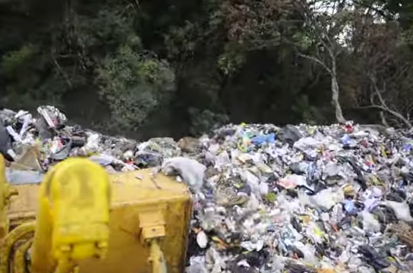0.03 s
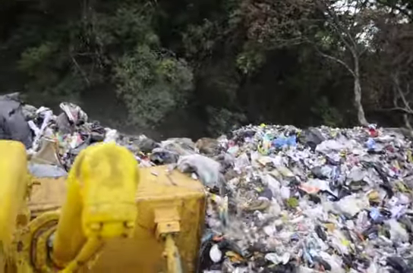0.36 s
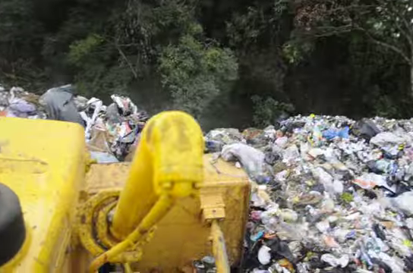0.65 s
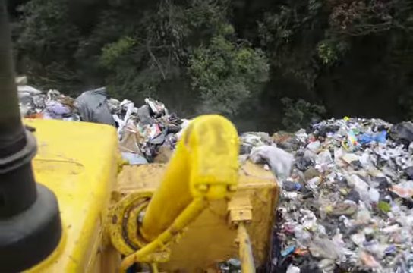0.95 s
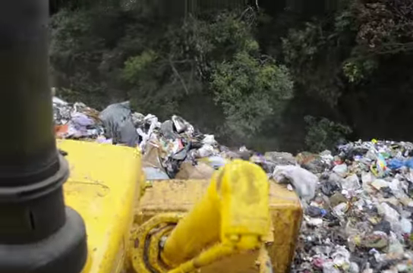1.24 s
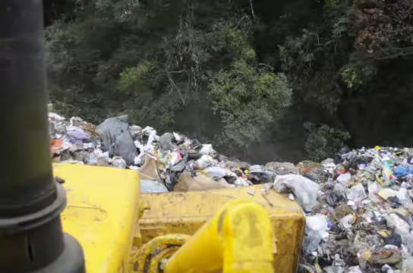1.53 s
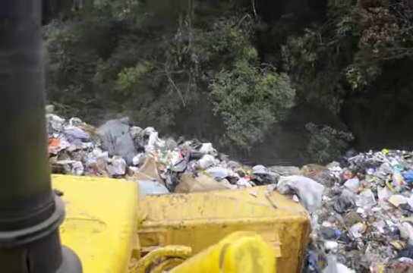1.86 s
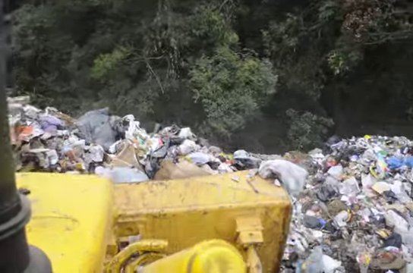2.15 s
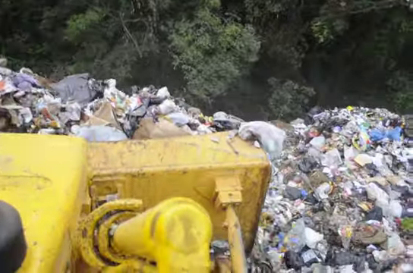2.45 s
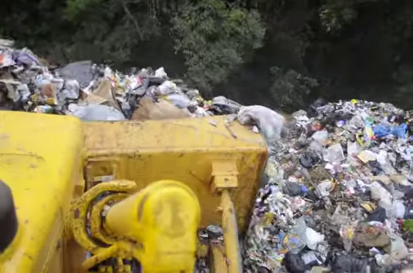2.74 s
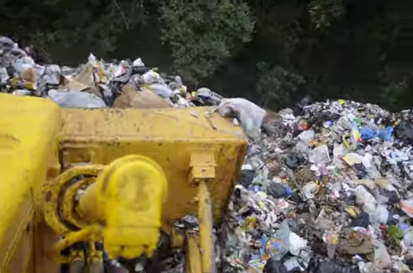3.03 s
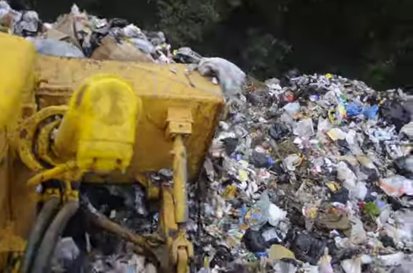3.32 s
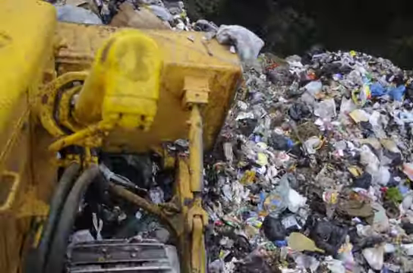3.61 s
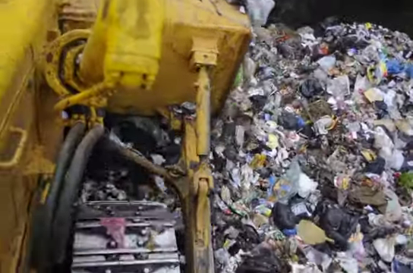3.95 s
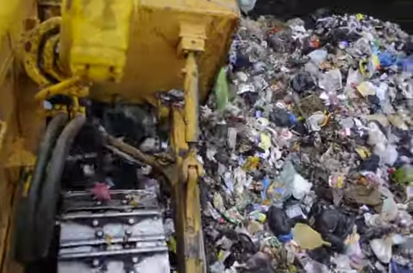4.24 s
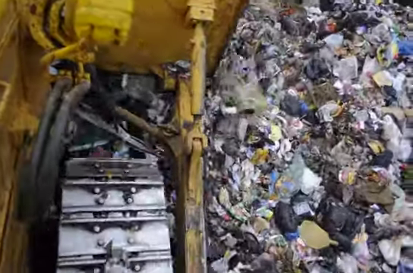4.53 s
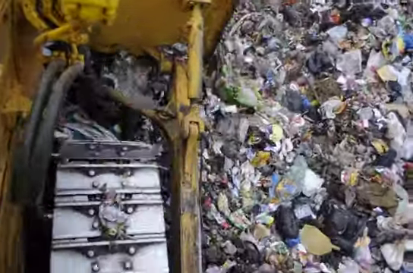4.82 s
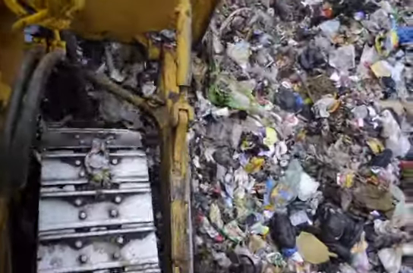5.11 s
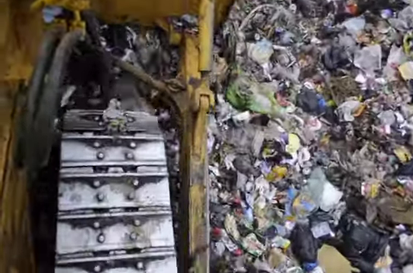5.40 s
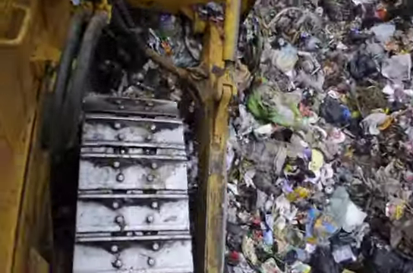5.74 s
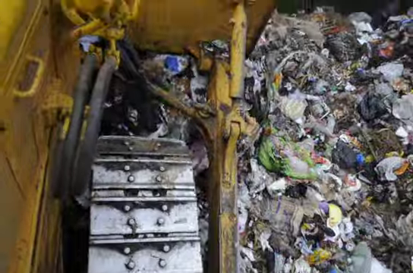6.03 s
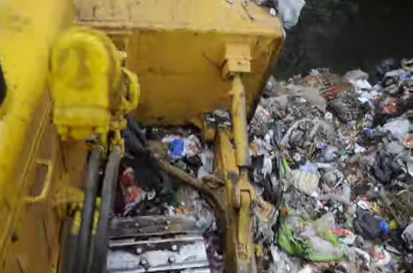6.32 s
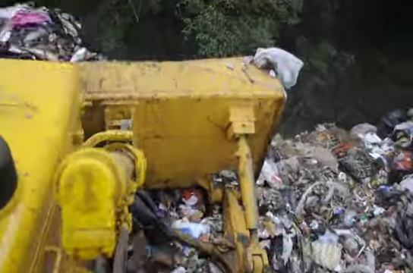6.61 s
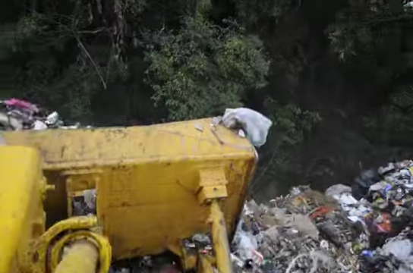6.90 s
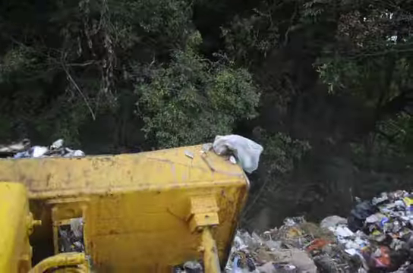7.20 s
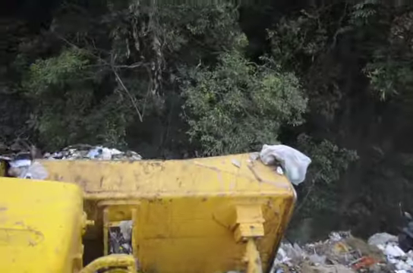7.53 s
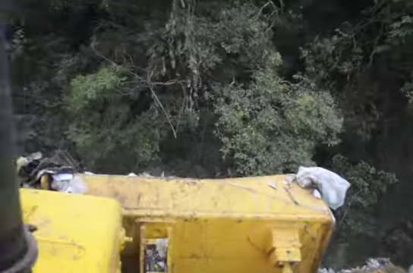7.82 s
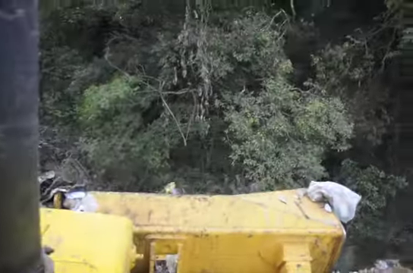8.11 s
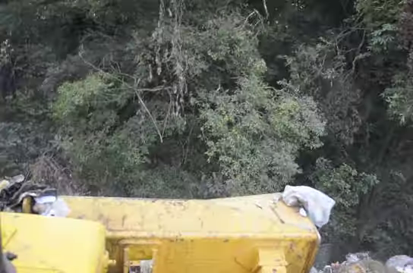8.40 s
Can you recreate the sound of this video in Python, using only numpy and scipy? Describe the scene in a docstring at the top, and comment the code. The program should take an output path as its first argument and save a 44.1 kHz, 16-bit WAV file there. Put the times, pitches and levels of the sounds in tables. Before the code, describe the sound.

Close diesel engine of a bulldozer running at working speed, briefly dropping to a rattling idle before picking up with hard knocks.

```python
"""A bulldozer's four-cylinder diesel, heard from on board in the open. At working speed each firing thumps
out of the exhaust stack and knocks in the block, over valve and gear clatter and rumbling bonnet panels.
From 2.5 s the microphone dips towards the track and comes back. At 6.7 s the fuel is cut: the engine
runs down to a shaking idle, with intake drone, stray knocks and small rattles. At 7.8 s the throttle
opens and the engine picks up with hard knocks."""
import sys
import numpy as np
from scipy import signal
from scipy.fft import rfft, irfft
from scipy.io import wavfile

SR = 44100
rng = np.random.default_rng(int(sys.argv[2]) if len(sys.argv) > 2 else 0)


def store_wav(level_fs):
    """Save 16-bit WAV to argv[1]."""
    pcm = np.round(np.clip(np.atleast_2d(level_fs), -1, 1) * 32767)
    wavfile.write(sys.argv[1], SR, pcm.T.astype(np.int16))


N = 373086
TIME = np.arange(N) / SR
AGE = TIME[:SR // 10]  # time since an impulse [s]


# exhaust pulse spectrum (frequency [Hz], level [dB])
STACK_SPECTRUM = [(20, -55), (40, -10.5), (52, -10), (100, -5), (150, -0.5), (205, 1.5), (255, 0.5),
                  (305, -4.5), (390, -27), (550, -12.5), (900, -13.5), (1600, -52), (4000, -46.5)]
# stack peaks and notches at the track (centre [Hz], width [Hz], gain [dB])
STACK_TRACK_MODES = [(142, 29, -0.5), (195, 8.6, -8), (246, 11, 7), (320, 200, 2), (570, 540, -6),
                     (857, 53, 8.5)]

def exhaust(phase, jitter_s=.00008, return_s=.0039, ring_hz=268, ring_swell_s=.0039, ring_lag_s=.0014):
    """Each firing thumps out of the stack, harder with fuel and speed; mainly one rings the pipe."""
    times, (_, pipe_db) = firings(phase, angle=.35)
    scatter, jitter = rng.standard_normal((len(times), 2)).T
    coast, _, surge = throttle(times)
    slow = slowness(times)
    gas = .55 + .45 * fuelling(times)  # air + fuel
    chug_db = 3.5 * coast * slow ** 8  # governor catches the idle
    effort_db = -6 * slow + chug_db + 6 * surge
    size = gas * undb(effort_db + .8 * mic_dip(times) + .9 * scatter)
    times = times + jitter_s * jitter
    # at low speed each pulse returns once along the pipe
    labour = np.clip(3 * slow, 0, 1) ** 2
    puffs = pulses(times, size) + .78 * pulses(times + return_s, size * labour)
    thump = -aimed_colour(puffs, STACK_SPECTRUM, (), STACK_TRACK_MODES)
    ring = AGE * np.exp(-AGE / ring_swell_s) * np.sin(2 * np.pi * ring_hz * AGE)
    pipe = strike(times + ring_lag_s, size * (1 - labour / 2) * undb(pipe_db), ring)
    return undb(-23.1) * thump + undb(-31.5) * unit(pipe)


# cylinders in firing order (knock [dB], pipe ring [dB])
CYLINDER_LEVELS = [(-3, -20), (2.3, -24), (-3, 0), (1.8, -18)]

def firings(phase, angle):
    """Time of each firing at this fraction of its interval, and its cylinder's levels."""
    index = np.arange(int(phase[-1]) + 1)
    times = np.interp(index + angle, phase, TIME, right=2 * TIME[-1])
    return times, np.array(CYLINDER_LEVELS)[index % len(CYLINDER_LEVELS)].T


def knock(phase, jitter_s=.00013, rise_s=.0014, decay_s=.0064, crack_hz=3000):
    """Abrupt ignition: pressure ripple swells and dies in the block; the harder, the brighter."""
    times, (cylinder_db, _) = firings(phase, angle=.432)
    scatter, jitter = rng.standard_normal((len(times), 2)).T
    times = times + jitter_s * jitter
    fuel, dip = np.maximum(fuelling(times), 0), mic_dip(times)
    force = fuel * undb(-3.5 * dip)
    hardness = force ** 2.8 * undb(-6 * dip)
    size = force * undb((cylinder_db + .98 * scatter) / np.maximum(fuel, 1))  # more even at full fuel
    burst = (1 - np.exp(-AGE / rise_s)) ** 2 * np.exp(-AGE / decay_s)
    ripple = strike(times, size, burst) * rng.standard_normal(N)
    crack = strike(times, hardness, burst) * rng.standard_normal(N)
    return undb(-23.5) * unit(highpass(ripple, 650, order=1)) + undb(-27) * unit(highpass(crack, crack_hz))


def clatter(phase, taps_per_firing=5, decay_s=.003):
    """Valves, gears and linkage tap over the fan's rush; gears ease off load, then rattle near idle."""
    taps = np.arange(int(phase[-1] * taps_per_firing))
    tap_phase = (taps + .3 * rng.standard_normal(len(taps))) / taps_per_firing
    times = np.interp(tap_phase, phase, TIME)
    tapping = strike(times, np.ones(len(taps)), np.exp(-AGE / decay_s)) * rng.standard_normal(N)
    fan = rng.standard_normal(N)
    slack = 1 - .3 * np.cos(np.pi * (phase - .33)) ** 4  # compression holds the gears tight
    rattle = slack * (unit(tapping) + fan)
    rattle = rattle - .23 * highpass(rattle, 650, order=1)  # duller than the knock
    coast, pull, _ = throttle()
    backlash_db = 7 * slowness() ** 4
    return undb(-27.5 + 3.5 * mic_dip() + coast * (backlash_db - 1.5) + 2.3 * pull) * unit(rattle)


# stray knocks and small rattles (time [s], level [dB])
STRAY_HITS = [(6.897, -23.5), (7.345, -18), (7.413, -22), (7.745, -14.5)]

def stray_knocks(decay_s=.008):
    """Knocks and small rattles as the engine slows; the last is a firing knock just before the pickup."""
    times, db = np.transpose(STRAY_HITS)
    return strike(times, undb(db), np.exp(-AGE / decay_s)) * rng.standard_normal(N)


# radiation of the engine's iron (frequency [Hz], level [dB])
IRON_SPECTRUM = [(150, -37), (400, -7.5), (550, 1), (750, 0.5), (1000, -3.5), (1500, -5.5), (2200, -3.5),
                 (2550, -8), (3500, -11.5), (4200, -19), (5000, -28), (6500, -34.5)]
# its peaks and notches over the bonnet (centre [Hz], width [Hz], gain [dB])
IRON_BONNET_MODES = [(552.5, 49, 4.5), (721, 49, 2), (953, 87, -9), (1235, 260, 7.5), (1628, 51, 9.5),
                     (1717, 170, -10.5), (1953, 110, 8), (2240, 170, 5), (3800, 200, 0.5)]
# its peaks and notches at the track (centre [Hz], width [Hz], gain [dB])
IRON_TRACK_MODES = [(557, 430, -7.5), (864, 180, 10.5), (949, 13, 6.5), (1120, 91, -10), (1317, 320, 7),
                    (1768, 220, 8), (2140, 210, 5.5), (2364, 300, -9), (3470, 1300, -1)]

def ironwork(blows, tail_db=-10, decay_s=.014):
    """The block radiates the blows; covers and frame add a short tail of close modes."""
    age = TIME[:SR // 8]
    tail = highpass(rng.standard_normal(len(age)), 670) * np.exp(-age / decay_s)
    ringing = blows + undb(tail_db) * signal.fftconvolve(blows, tail / np.linalg.norm(tail))[:N]
    return np.std(blows) * aimed_colour(ringing, IRON_SPECTRUM, IRON_BONNET_MODES, IRON_TRACK_MODES)


# bonnet panel response (frequency [Hz], level [dB])
PANEL_SPECTRUM = [(25, -51.5), (60, -24), (110, -8.5), (170, -1), (225, -0.5), (290, -5), (350, -8.5),
                  (400, -18.5), (900, -44)]

def bonnet(phase):
    """Loose panels rumble, jolted at each firing; harder near idle as the engine rocks on its mounts."""
    jolt = 1 + .65 * np.cos(2 * np.pi * (phase - .72))
    rumble = unit(colour(jolt * rng.standard_normal(N), PANEL_SPECTRUM))
    return undb(-28 + 3 * mic_dip() + 6.5 * slowness() ** 5) * rumble


def intake(phase, duct_hz=68, duct_q=1.3):
    """Air drawn by the pistons drones in a resonant duct on three harmonics, once the speed sags."""
    harmonic = np.arange(1, 4)[:, None]
    tuning = harmonic * firing_hz() / duct_hz
    partials = np.cos(2 * np.pi * harmonic * (phase - .535)) / np.hypot(1, duct_q * (tuning - 1 / tuning))
    onset = ramp(slowness() / .29) ** 2
    _, pull, _ = throttle()
    return onset * undb(-31 - 1.5 * pull) * unit(partials.sum(axis=0))


CUT_S, IDLE_HZ = 6.672, 25.86
PICKUP_S, PICKUP_HZ = 7.762, 45.97
# governed speed, varying with load (time [s], firing rate [Hz])
GOVERNED_RATE = [(0, 49.92), (.44, 51.25), (1.0, 51.2), (1.255, 50.19), (2.25, 50.3), (3.07, 51.75),
                 (3.77, 51.3), (4.0, 50.38), (4.97, 51.24), (6.7, 50.81)]

def firing_hz(at=TIME, run_down_s=.461, run_up_s=.618):
    """Governed speed; the flywheel runs down after the cut and climbs after the pickup."""
    spin = np.exp(-(np.maximum(at - CUT_S, 0) / run_down_s) ** 1.5)
    coasting_hz = IDLE_HZ + (curve(GOVERNED_RATE, at) - IDLE_HZ) * spin
    return PICKUP_HZ + (coasting_hz - PICKUP_HZ) * np.exp(-np.maximum(at - PICKUP_S, 0) / run_up_s)


def slowness(at=TIME):
    """0 at working speed, 1 at idle."""
    return np.clip(1 - (firing_hz(at) - IDLE_HZ) / (curve(GOVERNED_RATE, at) - IDLE_HZ), 0, 1)


def throttle(at=TIME, close_s=.085, open_s=.01, surge_s=.14):
    """Fuel rack state: coasting, pulling, first surge of the pull (each 0-1)."""
    pull = ramp((at - PICKUP_S) / open_s + .5)
    coast = ramp((at - CUT_S) / close_s) - pull
    surge = pull * np.exp(-((at - PICKUP_S) / surge_s) ** 4)
    return coast, pull, surge


def fuelling(at):
    """Fuel per firing, 1 at work: cut, fed back near idle, rich at the pickup, easing with speed."""
    coast, pull, surge = throttle(at)
    slow = slowness(at)
    working = 1 - coast - pull
    return working + .56 * coast * slow ** 1.7 + 2.32 * pull * slow ** .16 + .5 * surge


# microphone aim (time [s], dip [0-1])
MIC_AIM = [(0, 0.22), (2.45, 0.08), (3.15, 0.48), (4.5, 0.71), (6.05, 0.76), (6.7, 0.33), (7.3, 0.34)]

def mic_dip(at=TIME):
    """0 over the bonnet, 1 down at the track."""
    return curve(MIC_AIM, at)


def aimed_colour(x, spectrum, bonnet_modes, track_modes):
    """Blend a body's bonnet-side and track-side colours by microphone dip."""
    dip = mic_dip()
    over_bonnet = unit(colour(x, spectrum, bonnet_modes))
    at_track = unit(colour(x, spectrum, track_modes))
    return (1 - dip) * over_bonnet + dip * at_track


def colour(x, spectrum, modes=()):
    """Ring x through a minimum-phase body with this spectrum and these modes."""
    grid_hz = np.maximum(np.arange(4097) * SR / 8192, 1)
    hz, db = np.transpose(spectrum)
    shape_db = np.interp(np.log(grid_hz), np.log(hz), db)
    for centre_hz, width_hz, gain_db in modes:
        shape_db += gain_db / (1 + (2 * (grid_hz - centre_hz) / width_hz) ** 2)
    cepstrum = irfft(np.log(undb(shape_db)))
    half = len(cepstrum) // 2
    cepstrum[1:half] *= 2
    cepstrum[half + 1:] = 0
    response = irfft(np.exp(rfft(cepstrum)))[:half]
    return signal.fftconvolve(x, response)[:N]


def pulses(times, sizes):
    """One impulse at each time."""
    return np.bincount(np.clip(times * SR, 0, N).astype(int), sizes, N + 1)[:N]


def strike(times, sizes, shape):
    """One scaled copy of shape at each time."""
    return signal.fftconvolve(pulses(times, sizes), shape)[:N]


def highpass(x, edge_hz, order=2):
    """Butterworth high-pass."""
    return signal.sosfilt(signal.butter(order, edge_hz, "high", fs=SR, output="sos"), x)


def curve(table, at):
    """Interpolate a (time, value) table."""
    return np.interp(at, *np.transpose(table))


def ramp(x):
    """Smooth step over 0-1."""
    return np.sin(np.pi / 2 * np.clip(x, 0, 1)) ** 2


def undb(db):
    """Decibels to gain."""
    return 10 ** (np.asarray(db) / 20)


def unit(x):
    """Scale to rms 1."""
    return x / np.std(x)


def scene():
    """One crank drives exhaust, block, panels and intake; mono."""
    phase = np.cumsum(firing_hz()) / SR  # [firings]
    blows = knock(phase) + clatter(phase) + stray_knocks()
    return (exhaust(phase) + ironwork(blows) + bonnet(phase) + intake(phase))[None]


def record(dry, band_hz=5250, clip_level=.72, top_hz=15500):
    """Narrow-band microphone; the hardest knocks clip and crackle faintly."""
    band_limit = signal.butter(14, band_hz, fs=SR, output="sos")
    clipped = np.clip(signal.sosfiltfilt(band_limit, dry), -clip_level, clip_level)
    softened = .45 * clipped + .55 * signal.sosfiltfilt(band_limit, clipped)
    return signal.sosfilt(signal.ellip(8, .2, 70, top_hz, fs=SR, output="sos"), softened)


dry = scene()
out = record(dry)
store_wav(out)
```